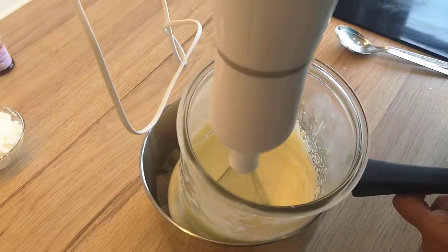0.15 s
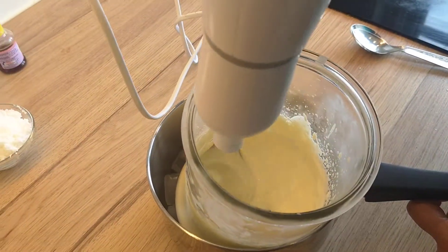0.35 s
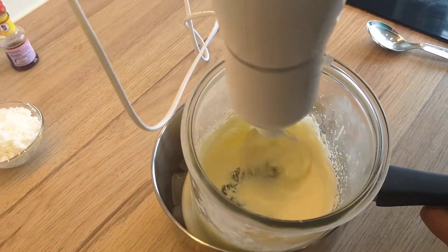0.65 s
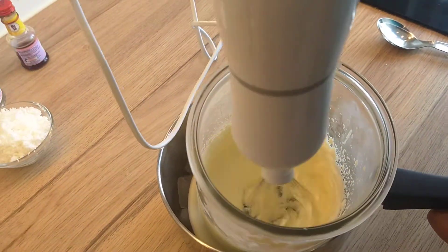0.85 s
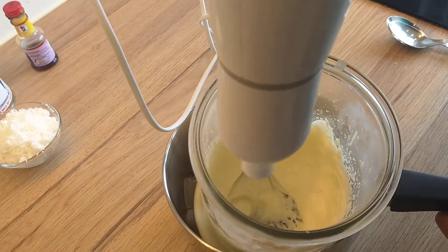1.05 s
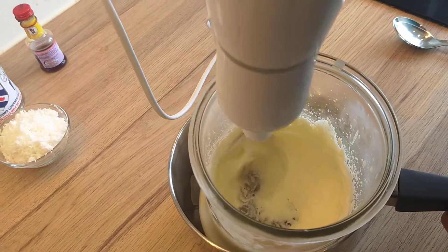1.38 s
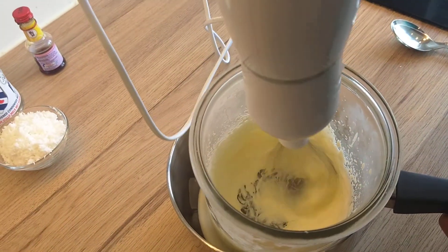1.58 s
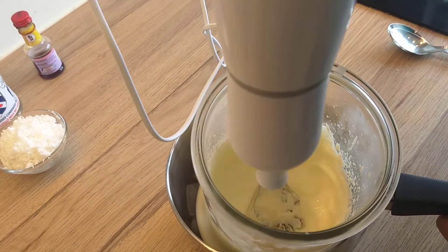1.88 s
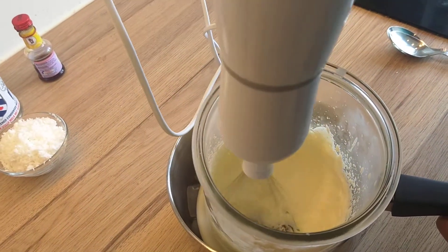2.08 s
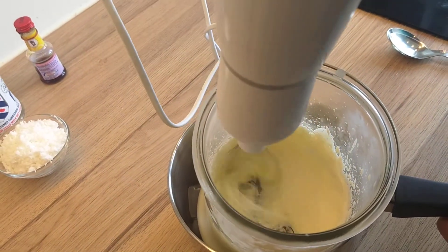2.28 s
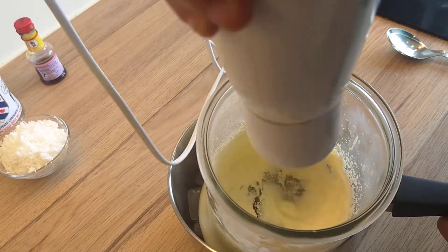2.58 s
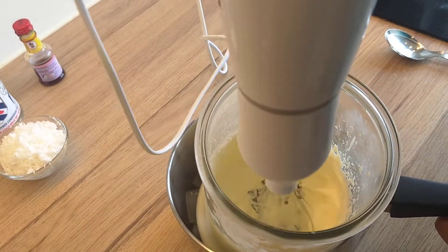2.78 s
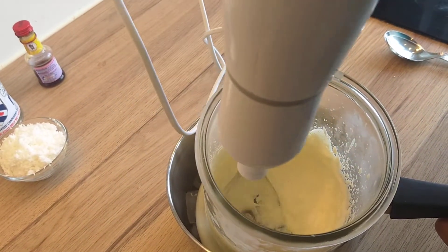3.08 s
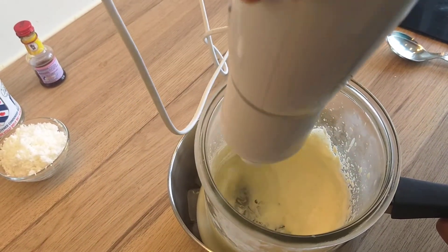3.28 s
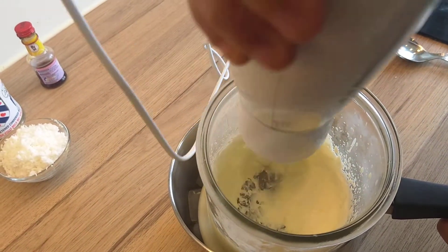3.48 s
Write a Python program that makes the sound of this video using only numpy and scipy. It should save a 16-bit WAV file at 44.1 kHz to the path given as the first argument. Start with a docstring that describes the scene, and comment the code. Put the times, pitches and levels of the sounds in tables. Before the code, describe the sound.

Close hand blender motor whirring with buzzing gear whine and rattle, briefly bogging down under load

```python
"""An electric hand blender whisks cream in a glass jar, heard close up in wide stereo.
The motor speeds up for about half a second, then runs almost steadily: its pinion (small gear) whines,
the gear wheel rattles and knocks at the same places in every whisk turn, and the wires churn the cream.
Soon after 2.5 s the speed sags deeply, then recovers, and it sags again at the end.
Gears and rotor are tones tied to the motor's angle; rattle, hiss, knocks and cream are filtered noise."""
import sys
import numpy as np
from scipy import signal
from scipy.fft import rfft, irfft
from scipy.io import wavfile

SR = 44100
rng = np.random.default_rng(int(sys.argv[2]) if len(sys.argv) > 2 else 0)


def generate_wav(signal):
    """Clip the signal to [-1, 1] and save it as 16-bit WAV at the path in sys.argv[1]."""
    frames = np.transpose(np.atleast_2d(signal))
    scaled = np.clip(frames, -1, 1) * 32767
    pcm = np.round(scaled).astype(np.int16)
    wavfile.write(sys.argv[1], SR, pcm)


N = 160965
TIME, BINS = np.arange(N) / SR, np.fft.rfftfreq(N, 1 / SR)  # seconds, Hz

# motor speed: (time [s], speed [turns per second])
MOTOR_SPEED = [(0.0, 287.1), (0.1, 312.7), (0.2, 328.6), (0.35, 341.6), (0.5, 347.3), (0.75, 352.5),
               (1.0, 349.4), (1.35, 352.5), (1.6, 352.4), (1.9, 349.5), (2.2, 349.5), (2.42, 348.7),
               (2.52, 346.3), (2.6, 309.1), (2.7, 249.4), (2.8, 225.2), (2.9, 262.0), (3.0, 305.8),
               (3.1, 327.9), (3.25, 339.8), (3.42, 347.7), (3.51, 348.3), (3.57, 311.8), (3.65, 268.0)]
FULL_SPEED_HZ, GEAR_RATIO = 350, 13  # the motor turns 13 times for one whisk turn
# loudness over time, before each layer's own trim:
# (time [s], gear level [dB], treble level [dB], churning level [dB])
LEVELS = [(0, -19.5, -32, -27.5), (0.08, -21, -28, -29.5), (0.17, -17.5, -24.5, -24.5),
          (0.26, -19.5, -25.0, -27.5), (0.5, -17.5, -24, -27), (0.75, -16.5, -23.5, -26.5),
          (1.28, -17.5, -23, -25), (1.39, -20, -27.5, -28), (1.5, -18.5, -25.5, -27.5),
          (2, -17.5, -21.5, -25.0), (2.2, -19, -25, -26.5), (2.4, -17, -24, -26.0), (2.55, -19, -26.5, -28),
          (2.68, -21.5, -34.5, -28.5), (2.8, -23.5, -41, -28.5), (2.9, -20, -25, -26.5),
          (2.98, -16, -24.5, -24), (3.06, -16.5, -25.0, -25), (3.14, -20, -28, -29),
          (3.26, -17.5, -23, -25), (3.5, -19, -23.5, -27.5), (3.57, -24, -33, -30.5), (3.65, -26, -43, -32)]

# mains hum tones: (frequency [Hz], relative level [dB])
MAINS_TONES = [(50, -8), (98, 3)]
# mains hum over time: (time [s], level [dB])
MAINS_LEVEL = [(0.0, -62), (0.17, -50), (0.34, -69), (0.41, -53), (0.57, -66), (1.36, -57), (1.66, -67),
               (1.88, -54.5), (3.65, -63.5)]
# rotor tones: (multiple of the motor speed, relative level [dB])
ROTOR_TONES = [(1, -2), (3, 4)]
# rotor hum over time: (time [s], level [dB])
ROTOR_LEVEL = [(0, -62), (.3, -48.5), (.6, -52.5), (1.2, -54.5), (1.8, -48), (2.3, -53), (2.8, -63),
               (3.05, -53), (3.3, -44), (3.65, -53)]

# colour of cream and jar: (frequency [Hz], relative level per Hz [dB])
CREAM_COLOUR = [(25, -48), (80, -17), (130, -28), (200, -23), (310, -8.5), (400, -13.5), (470, -8.5),
                (600, -12.5), (780, -7), (1080, 0), (1300, -2), (1550, 4), (1900, 8), (2150, -14),
                (3000, 1), (6000, -38)]
# resonances of the jar: (frequency [Hz], boost [dB])
JAR_RESONANCES = [(470, 4.1), (756, 5.5), (889, 2), (1024, 3.2), (1105, 3.6), (1265, 4), (1483, 7.8),
                  (1877, 4.5)]
JAR_WIDTH_HZ = 11.4  # this far from a resonance, its boost in dB is halved
CREAM_TRIM_DB, SPLASH_DB, SPLASH_HZ = 1.5, 1, 58.6  # layer trim; size and rate of the splashes

# tight spots of the gear wheel: (place in the turn [0-1], width [turns], extra force [relative])
TIGHT_SPOTS = [(.005, 0.0096, 1), (.31, 0.029, 1), (.48, 0.015, 0.81), (.66, 0.054, 0.99), (.75, 0.02, 0.8)]
SPOT_DRIFT_DB, PINION_BEAT = 3, 0.39  # slow drift of each spot; depth of the beat per motor turn

# hardest gear knocks: (time [s], relative level [dB])
HARD_KNOCKS = [(0.0613, -13), (0.1681, -8), (0.207, -11), (0.3217, -3), (0.8839, -12), (1.0044, 12),
               (1.07, 4), (1.1064, -8), (1.1423, -12), (1.5555, 4), (1.5948, 8), (2.005, -1), (2.2194, 6),
               (2.3522, -13), (2.4476, 10), (2.497, -16), (2.535, -10), (2.5731, -10), (2.961, 0),
               (3.2231, 9.5), (3.261, 2), (3.412, 0), (3.45, 2), (3.487, -13), (3.5271, 6), (3.5893, 0)]
# colour of a knock: (frequency [Hz], relative level per Hz [dB])
KNOCK_COLOUR = [(500, -30), (2000, -14), (3800, 0), (5000, -8), (7700, -8), (10000, -17), (15000, -23)]
KNOCK_TRIM_DB, KNOCK_DECAY_S = -12.5, .001
TICK_TRIM_DB, TICK_SPREAD_DB = -7, 2.5

# the housing under the rattling teeth: (frequency [Hz], relative level per Hz [dB])
HOUSING_COLOUR = [(1200, -37), (2200, -20), (2900, -8.5), (3450, -6), (3900, 2), (4300, 2.5), (4800, -1),
                  (6000, -29.5), (9000, -16)]
# hiss of brushes and gears: (frequency [Hz], relative level per Hz [dB])
HISS_COLOUR = [(3000, -22), (5200, 0.5), (6500, -6.5), (7600, 4.5), (8300, -4), (9200, -10), (11000, -8),
               (13500, -16.5), (15300, -36.5)]
# steady scrape of the whisk wires: (frequency [Hz], relative level per Hz [dB])
SCRAPE_COLOUR = [(1000, -35.5), (2500, 8.5), (4000, -9), (5400, -1), (6400, -3.5), (8000, -8.5),
                 (15000, -42)]
RATTLE_TRIM_DB, HISS_TRIM_DB, SCRAPE_DB = -2.5, 0.5, -23
RATTLE_GRIP, HISS_GRIP = 0.61, 0.32  # how closely each follows the tooth force (an exponent)

# gear tones: (multiple of the motor speed, relative level [dB])
GEAR_TONES = [(10, -10), (11, -1), (21, -12.5), (22, -13)]
# how well the housing radiates the gear tones: (frequency [Hz], gain [dB])
RADIATION = [(2200, -12), (2650, 0), (3000, -1), (3400, 1), (3900, -1), (4400, 8.5), (5300, 4.5),
             (6200, -1.5), (7000, -6.5), (7800, 2), (9500, -24)]
TOOTH_ERROR_RAD, WANDER_HZ = 0.87, 43
WANDER_RAD = .043  # phase wander per multiple of the motor speed, at full speed

# left minus right: (frequency [Hz], level difference [dB])
BALANCE = [(90, 4), (250, -0.5), (500, 0.5), (760, 2.5), (1400, -3.5), (2700, 0), (4000, -1), (5500, 1.5),
           (6500, -4), (8000, 0)]
# likeness of the channels' sum and difference: (frequency [Hz], likeness [0-1])
LIKENESS = [(100, 0.9), (700, 0.65), (1700, .55), (2800, 0.95), (4000, 0.6), (5200, 0.6), (6400, 0.4),
            (8500, .4), (14000, .2)]
# what is left in the notches of the sum: (frequency [Hz], level [dB])
SUM_FLOOR = [(100, -4.5), (450, -2), (800, -1.5), (2000, -94), (2500, -96), (4700, -9.5), (7000, -6),
             (9350, -22), (11700, -10.5), (14000, -22)]
# what is left in the notches of the difference: (frequency [Hz], level [dB])
DIFFERENCE_FLOOR = [(1100, -11), (3500, -8), (5850, -3), (8100, -9), (15000, -8)]
# weight of the difference: (frequency [Hz], gain [dB])
WIDTH = [(100, -6.5), (350, 1), (520, -0.5), (900, -7.5), (1600, 1.5), (2400, -6.5), (4400, -2.5),
         (8000, -1)]
NOTCH_SPACING_HZ, NOTCH_POWER = 1 / .000428, 1.4  # a higher power widens the notches
TOP_EDGE_HZ = 15500


def amp(db):
    """Turns decibels into a plain gain."""
    return 10 ** (np.asarray(db) / 20)


def unit(x):
    """Scales to an average strength (rms) of 1."""
    return x / np.sqrt(np.mean(x ** 2) + 1e-20)


def curve(table, axis=1):
    """Reads one column of a time table at every sample."""
    rows = np.array(table)
    return np.interp(TIME, rows[:, 0], rows[:, axis])


def read(points):
    """Reads a frequency table at every frequency bin, on a logarithmic scale."""
    hz, value = np.transpose(points)
    return np.interp(np.log(BINS + 1), np.log(hz), value)


def apply_gain(x, gain):
    """Multiplies each frequency of a sound by its gain."""
    return irfft(rfft(x) * gain, N)


def colour(x, points):
    """Shapes noise by a frequency table, keeping the power of white noise."""
    return apply_gain(x, unit(amp(read(points))))


def wander(hz):
    """Smooth random drift of rms 1; movements faster than hz fade out."""
    return unit(apply_gain(rng.standard_normal(N), 1 / (1 + (BINS / hz) ** 2)))


def hum(turns):
    """An unbalanced rotor hums in step with the motor; the mains hum wavers beside it."""
    rotor, mains = np.zeros(N), np.zeros(N)
    for multiple, db in ROTOR_TONES:
        rotor += amp(db) * np.cos(2 * np.pi * (round(multiple) * turns + rng.random()))
    for hz, db in MAINS_TONES:
        mains += amp(db) * np.cos(2 * np.pi * hz * TIME + 0.95 * wander(hz=13))
    return np.sqrt(2) * (rotor * amp(curve(ROTOR_LEVEL)) + mains * amp(curve(MAINS_LEVEL)))


def cream(turns):
    """The wires churn the cream in small splashes, pulsing with the whisk and ringing the jar."""
    whisk_pulse = 1 + 0.055 * np.cos(2 * np.pi * turns / GEAR_RATIO)
    stir = unit(whisk_pulse * amp(SPLASH_DB * wander(SPLASH_HZ)))
    ring_db = sum(db / (1 + ((BINS - hz) / JAR_WIDTH_HZ) ** 2) for hz, db in JAR_RESONANCES)
    splashes = apply_gain(stir * rng.standard_normal(N), amp(ring_db))
    return unit(colour(splashes, CREAM_COLOUR)) * amp(curve(LEVELS, axis=3) + CREAM_TRIM_DB)


def tooth_force(turns):
    """Force on the teeth: it peaks at each tight spot of the wheel and beats with the pinion."""
    force = np.ones(N)
    for place, width, extra in TIGHT_SPOTS:
        away = (turns / GEAR_RATIO - place + .5) % 1 - .5  # distance from the spot, in wheel turns
        bump = np.exp(-.5 * (away / width) ** 2)
        force += extra * amp(SPOT_DRIFT_DB * wander(hz=0.85)) * bump
    return unit(force * (1 + PINION_BEAT * np.cos(2 * np.pi * turns)))


def tooth_error(turns, count=14):
    """Uneven tooth spacing: a random pattern that repeats with each whisk turn and drifts slowly."""
    angle = 2 * np.pi * turns / GEAR_RATIO
    drift = .5 * wander(hz=0.5)
    error = np.zeros(N)
    for k in range(1, count):
        phase = rng.uniform(0, 2 * np.pi) + rng.normal() * drift
        error += np.cos(k * angle + phase) / np.sqrt(k + 2)
    return unit(error)


def knocks(turns):
    """Short cracks of gear play: light ticks at the tight spots and some hard knocks."""
    blows = np.zeros(N)
    for place, _, extra in TIGHT_SPOTS:
        # true at the sample where the wheel passes the spot
        passing = np.diff(np.floor(turns / GEAR_RATIO - place), append=-np.inf) > 0
        spread_db = TICK_SPREAD_DB * np.clip(rng.standard_normal(N), -2, 2)
        blows += passing * extra * amp(curve(LEVELS) + TICK_TRIM_DB + spread_db)
    for s, db in HARD_KNOCKS:
        blows[round(s * SR)] += amp(db + KNOCK_TRIM_DB)
    # each blow dies away quickly
    envelope = signal.lfilter([1], [1, -np.exp(-1 / (KNOCK_DECAY_S * SR))], blows)
    return colour(envelope * rng.standard_normal(N), KNOCK_COLOUR)


def rattle(force, grain):
    """Teeth chatter into the housing, brushes and gears hiss, and the whisk wires scrape."""
    body_noise, hiss_noise, scrape_noise = rng.standard_normal((3, N)) * grain
    body = colour(body_noise * unit(abs(force) ** RATTLE_GRIP), HOUSING_COLOUR)
    hiss = colour(hiss_noise * unit(abs(force) ** HISS_GRIP), HISS_COLOUR)
    scrape = colour(scrape_noise, SCRAPE_COLOUR) * amp(SCRAPE_DB)
    body *= amp(curve(LEVELS) + RATTLE_TRIM_DB)
    hiss *= amp(curve(LEVELS, axis=2) + HISS_TRIM_DB)
    return body + hiss + scrape


def whine(turns, force, error):
    """Meshing teeth sing; uneven spacing adds side tones, and a labouring motor sounds rougher."""
    looseness = WANDER_RAD * (FULL_SPEED_HZ / curve(MOTOR_SPEED)) ** 3.6  # grows as the speed sags
    tones = np.zeros(N)
    for multiple, db in GEAR_TONES:
        phase = 2 * np.pi * (round(multiple) * turns + rng.random())
        tones += amp(db) * np.cos(phase + error + multiple * looseness * wander(WANDER_HZ))
    return apply_gain(np.sqrt(2) * tones * force * amp(curve(LEVELS)), amp(read(RADIATION)))


def widen(first, second):
    """Stereo widening: sum and difference of the channels have alternating notches."""
    angle, like = np.pi * BINS / NOTCH_SPACING_HZ, np.clip(read(LIKENESS), 0, 1)
    mid = first * np.hypot(abs(np.sin(angle)) ** NOTCH_POWER, amp(read(SUM_FLOOR)))
    # the difference is partly the first rendering, a quarter cycle shifted, and partly the second
    side = -1j * np.sign(np.sin(2 * angle)) * like * first + np.sqrt(1 - like ** 2) * second
    side = side * np.hypot(abs(np.cos(angle)) ** NOTCH_POWER, amp(read(DIFFERENCE_FLOOR)))
    side = side * amp(read(WIDTH))
    tilt = amp(read(BALANCE) / 2)  # half the balance goes to each channel
    return irfft(np.array([(mid + side) * tilt, (mid - side) / tilt]), N)


def scene():
    """All parts share the motor's angle; two renderings with fresh noise make the stereo width."""
    turns = np.cumsum(curve(MOTOR_SPEED)) / SR
    force, error = tooth_force(turns), TOOTH_ERROR_RAD * tooth_error(turns)
    grain = unit(amp(1.24 * wander(hz=497)))  # fast, small changes of loudness
    renderings = []
    for _ in range(2):
        background = hum(turns) + cream(turns)
        gears = knocks(turns) + rattle(force, grain) + whine(turns, force, error)
        renderings.append(rfft(background + gears))
    return widen(*renderings)


def record(dry):
    """Softly rounds the highest peaks, then removes the sound above the top edge."""
    rounded = dry / (1 + (dry / .9) ** 6) ** (1 / 6)
    low_pass = signal.firwin(511, TOP_EDGE_HZ, window=("kaiser", 9), fs=SR)
    return signal.oaconvolve(rounded, low_pass[None], "same", axes=1)


dry = scene()
out = record(dry)
generate_wav(out)
```